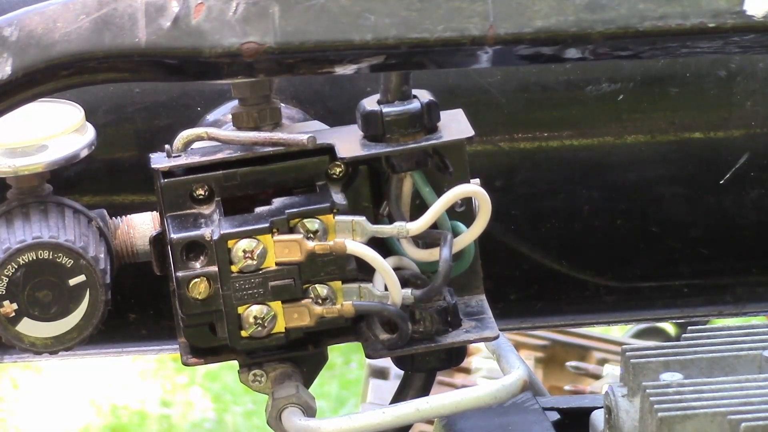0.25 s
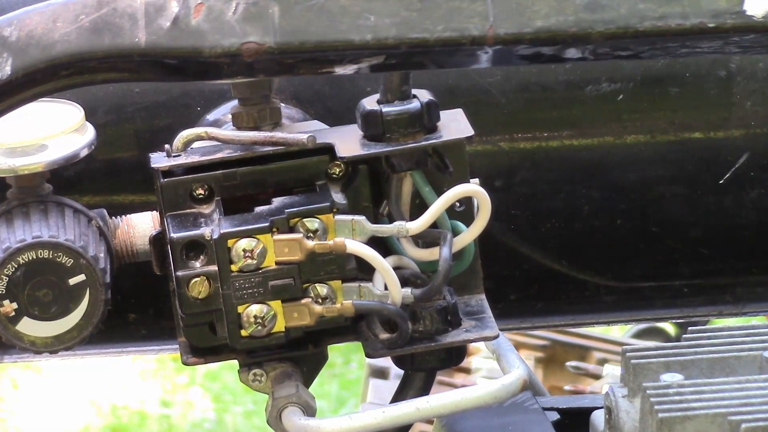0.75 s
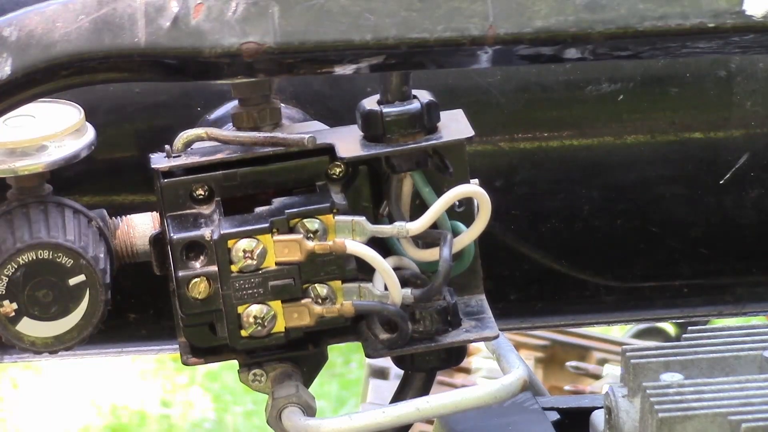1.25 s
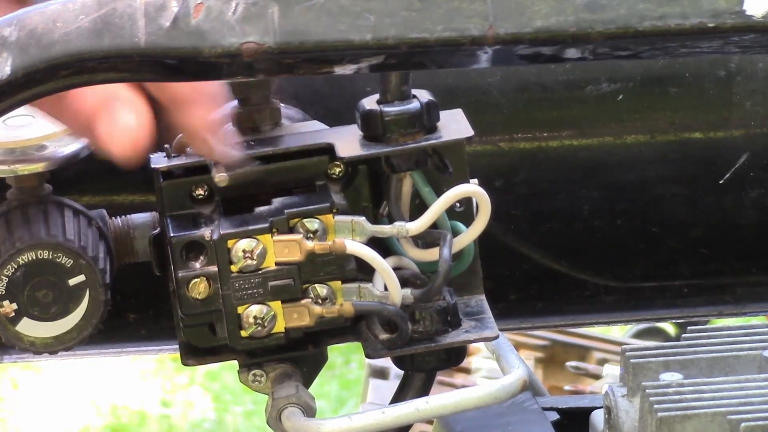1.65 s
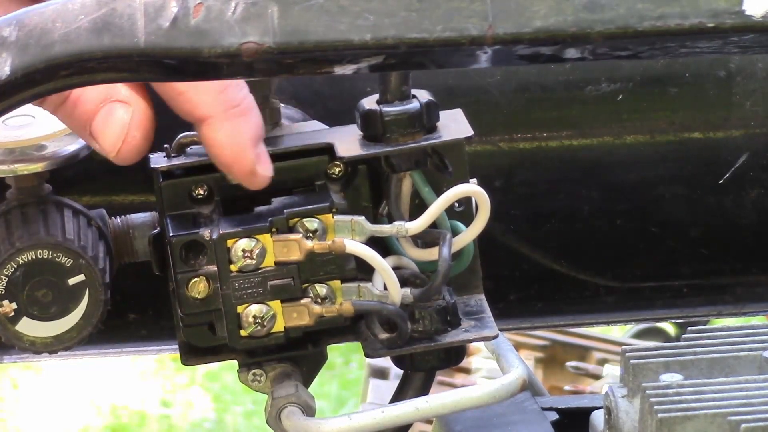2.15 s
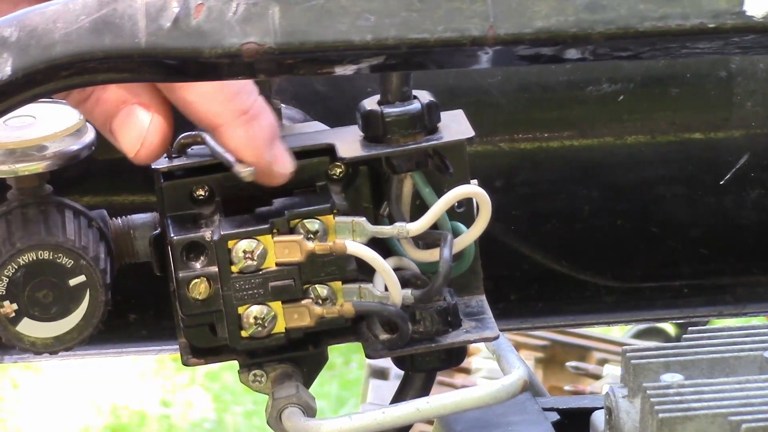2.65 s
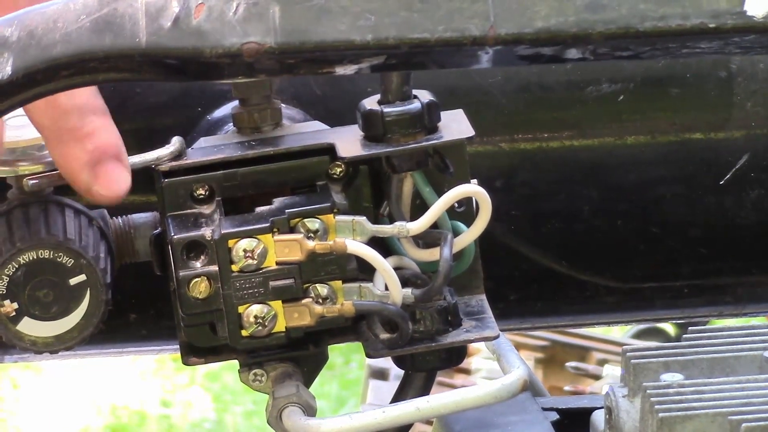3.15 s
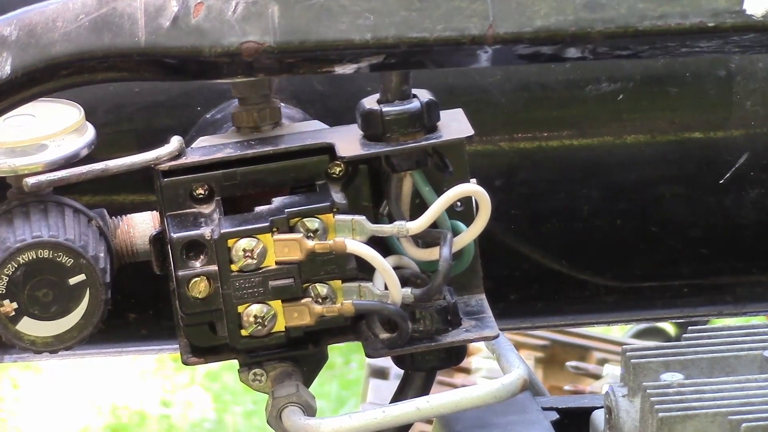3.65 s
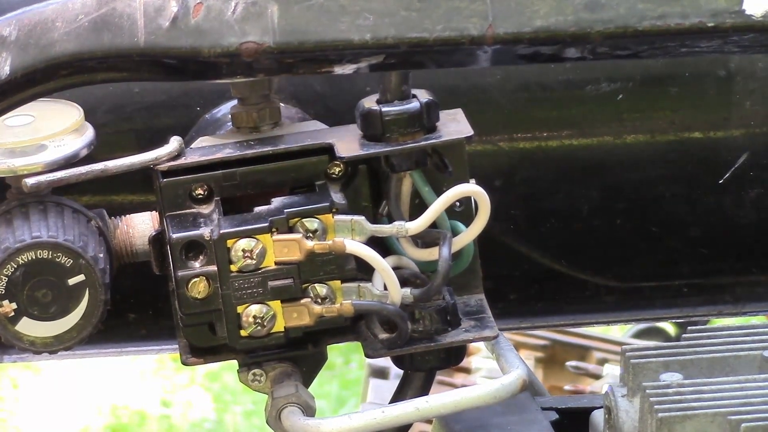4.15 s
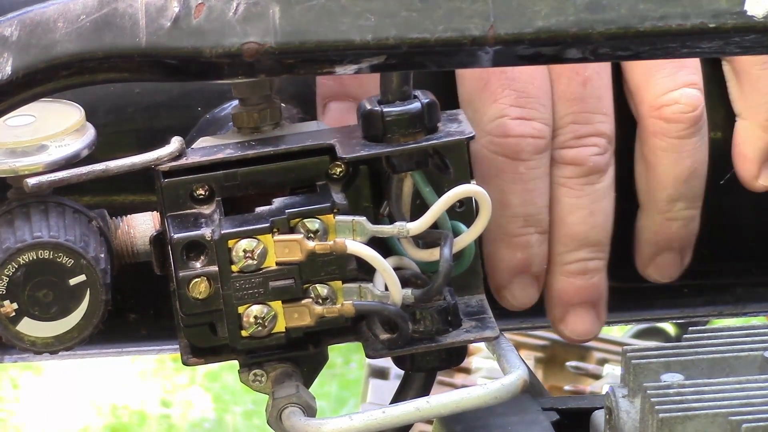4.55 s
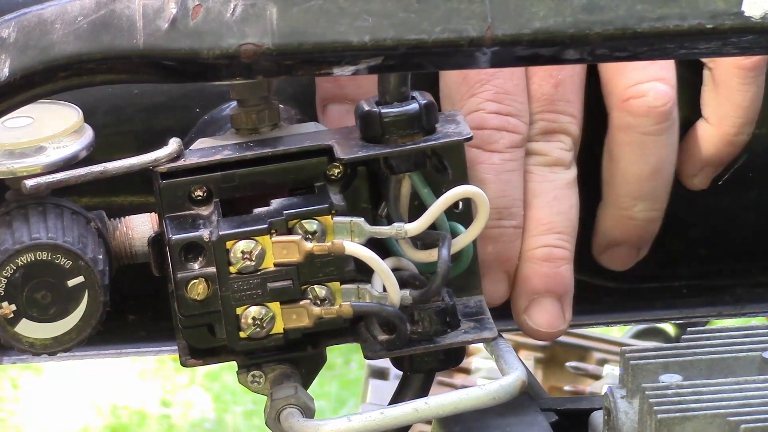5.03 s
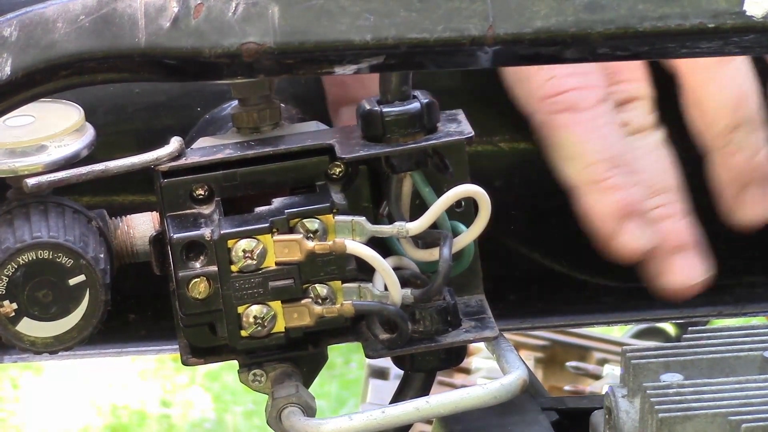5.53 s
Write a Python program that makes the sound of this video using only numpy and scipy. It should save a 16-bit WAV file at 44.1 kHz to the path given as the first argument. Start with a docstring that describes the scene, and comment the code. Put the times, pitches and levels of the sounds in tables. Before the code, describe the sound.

An air compressor's safety valve hisses loudly over the thudding pump, which coasts to a stop; the hiss then cuts off.

```python
"""A yard, close to a piston air compressor that blows off through its safety valve with a loud hiss.
The pump thuds and clacks under the jet until the motor is switched off and it coasts to rest.
A hand reaches in, recolouring the hiss, and the valve closes in two steps with a breathy whistle.
The automatic gain comes back up on faint outdoor air: a bird calls, and the valve weeps as the hand
lets go."""
import sys
import numpy as np
from scipy import signal
from scipy.fft import rfft, irfft
from scipy.io import wavfile
from scipy.ndimage import uniform_filter1d

SR = 44100
rng = np.random.default_rng(int(sys.argv[2]) if len(sys.argv) > 2 else 0)


def file_out(sig):
    """Save sig as 16-bit WAV at sys.argv[1]."""
    # one column per channel
    cols = np.atleast_2d(sig).T
    # limit, then scale
    lim = np.clip(cols, -1, 1)
    pcm = np.round(lim * 32767).astype(np.int16)
    wavfile.write(sys.argv[1], SR, pcm)


N = 255339
T = np.arange(N) / SR
HZ = np.maximum(np.arange(N // 2 + 1) * SR / N, 1)


def undb(db):
    """Decibels to gain."""
    return 10 ** (np.asarray(db) / 20)


def unit(x):
    """Scale to rms 1."""
    return x / np.sqrt(np.mean(x ** 2))


def curve(points):
    """Automation line through (time_s, value) points."""
    return np.interp(T, *np.transpose(points))


def bell(centre_s, width_s):
    """Smooth swell in time, 1 at its centre."""
    return np.exp(-((T - centre_s) / width_s) ** 2)


def colour(points):
    """EQ curve through (freq_hz, gain_db) points."""
    hz, db = np.transpose(points)
    return undb(np.interp(np.log(HZ), np.log(hz), db))


def peak(hz, width_hz):
    """Bell-shaped resonance, 1 at its centre."""
    return 1 / (1 + (2 * (HZ - hz) / width_hz) ** 2)


def noise(eq):
    """Noise of rms 1, shaped by an EQ curve."""
    return unit(irfft(rfft(rng.standard_normal(N)) * eq, N))


def drift(rate_hz):
    """Smooth random wobble of rms 1."""
    return noise(1 / (1 + (HZ / rate_hz) ** 4))


def ring(x, eq):
    """Ring a sound through an EQ curve, made causal by folding the cepstrum."""
    cepstrum = irfft(np.log(eq), N)
    cepstrum[1:] *= 2
    cepstrum[N // 2:] = 0
    return irfft(rfft(x) * np.exp(rfft(cepstrum)), N)


def echoes(x, t60_s):
    """Diffuse reflections: a decaying noise tail of unit energy."""
    t = T[:SR]
    tail = rng.standard_normal(SR) * undb(-60 * t / t60_s) * (t > .004)
    tail = signal.lfilter([1, 1], [1, -.3], tail)  # surfaces swallow the top
    return signal.fftconvolve(x, tail / np.linalg.norm(tail))[:N]


# Broad tone of the jet: freq_hz, gain_db
JET_EQ = [(30, -42.5), (90, -36), (180, -21), (330, -11), (700, -5.5), (1100, -0.5), (2300, -2.5),
          (4200, -3.0), (6000, -2.5), (8000, -6.5), (10500, -2.5), (12500, -5.5), (14000, -10),
          (15500, -15.5)]
# Resonances of the valve body and gaps between fittings: pitch_hz, width_hz, bare_db, covered_db
VALVE_CAVITIES = [(448, 470, 4, 9.5), (886, 440, 3, 4), (1270, 150, 5, 4), (1445, 60, 1.5, 0),
                  (1990, 350, 2, 6), (2774, 340, 5, 4), (3295, 360, 5.5, 4), (3780, 330, 4, 7),
                  (4304, 210, 4, 6), (4706, 490, 6.5, 8), (5440, 520, 7.5, 9), (5750, 80, 0.5, 3),
                  (6090, 290, 5.5, 7.5), (6664, 65, 6.5, 6.5), (6970, 410, 2, 0.5), (7540, 190, 4.5, 3.4),
                  (8650, 450, 3, 4), (9000, 120, 3, 1), (9750, 450, 3, -1.5), (10730, 290, 3.5, 1.5),
                  (11580, 280, 3.5, 4.5), (12800, 170, 4, 3), (14150, 130, 1.5, 5), (15080, 230, 3.5, 4)]
# Splits between the jet's rumble, roar, hiss and sizzle: freq_hz
JET_CROSSOVERS = [750, 1700, 6500]
# Balance of those four bands: base_db, full_pressure_boost_db, swell_boost_db, hand_boost_db
JET_MIX = [(-48.5, 1.2, 2.2, 3.5), (-39.2, 1.3, 2, 0.76), (-32, 2.5, -0.2, 0.2), (-35, 4.4, -0.2, 0.7)]
# Airflow as the valve closes in two steps: time_s, flow_db
VALVE_FLOW = [(4.895, 0.5), (4.94, -7.5), (5.05, -9.5), (5.061, -9.5), (5.072, -49), (5.1, -70)]


def jet(gain_db=11, flutter_db=0.32, band_flutter_db=0.35, steepen=.018):
    """Turbulent air rings the valve's cavities and dulls as the tank empties; a hand reshapes them."""
    bare_eq = colour(JET_EQ) * undb(sum(db * peak(hz, width) for hz, width, db, _ in VALVE_CAVITIES))
    covered_eq = colour(JET_EQ) * undb(sum(db * peak(hz, width) for hz, width, _, db in VALVE_CAVITIES))
    pressure = np.exp(-(T / 0.95) ** 1.3)  # the excess bleeds away, fastest in the first second
    swell = bell(centre_s=2.94, width_s=0.77)  # the rumble and roar swell once
    reach = np.clip((T - 3.5) / 0.45, 0, 1)  # the hand moves in
    cover = 0.14 + 0.86 * reach
    turbulence = rfft(rng.standard_normal(N))
    band_index = np.searchsorted(JET_CROSSOVERS, HZ)
    air = np.zeros(N)
    for k, (base_db, pressure_db, swell_db, hand_db) in enumerate(JET_MIX):
        band = turbulence * (band_index == k)
        bare = unit(irfft(band * bare_eq, N))
        covered = unit(irfft(band * covered_eq, N))
        band_db = base_db + pressure_db * pressure + swell_db * swell + hand_db * reach
        air += ((1 - cover) * bare + cover * covered) * undb(band_db + band_flutter_db * drift(16))
    # tiny shocks make the pressure wave lopsided
    shocks = irfft(rfft(air * unit(air)) * (HZ > 900), N)
    return (air - steepen * shocks) * undb(gain_db + curve(VALVE_FLOW) + flutter_db * drift(27))


def tank(machine, pitch_hz=1245, width_hz=60, send_db=-12):
    """The steel tank rings faintly along with the machine."""
    return undb(send_db) * ring(echoes(machine, t60_s=0.066), peak(pitch_hz, width_hz))


# Body of one delivery thud: freq_hz, gain_db
THUD_EQ = [(20, -21.5), (58, -17), (110, -14), (175, -1.5), (290, -1.5), (450, -13.5), (900, -36.5),
           (3000, -77)]
# The crankshaft runs, then coasts to rest: time_s, turns_per_s
SHAFT_SPEED = [(0, 29.19), (1.8, 29.19), (2.83, 29.3), (2.866, 27.5), (2.907, 21.7), (2.965, 14.3),
               (3.056, 8.5), (3.22, 0)]


def pump(motor_off_s=2.9, thud_db=-40, growth_db=4.5, coast_db=-6.5, clack_db=-29, clack_turns=0.056):
    """Each turn gives a delivery thud, a reed clack and, at speed, a gulp that rings the air filter."""
    speed = curve(SHAFT_SPEED)
    pace = speed / speed.max()
    turns = np.cumsum(speed) / SR - .14
    deliveries = np.diff(np.floor(turns), prepend=-1) * undb(0.39 * drift(14))
    gulps = np.diff(np.floor(turns - 0.299), prepend=-1) * pace ** 4 * undb(.8 * drift(20))
    air_filter = peak(hz=214, width_hz=84) * HZ / (HZ + 100)
    thuds = ring(gulps, air_filter) - ring(deliveries, colour(THUD_EQ))
    thuds /= np.std(thuds[pace > .9])
    turns_since_clack = (turns - .06) % 1
    clacks = noise(peak(hz=1250, width_hz=350)) * np.exp(-turns_since_clack / clack_turns) * pace ** .3
    # strokes grow heavier while the motor runs and lighter as it coasts
    stroke_db = thud_db + growth_db * np.minimum(T / motor_off_s, 1) ** 2 + coast_db * (1 - pace)
    return undb(stroke_db) * thuds + undb(clack_db) * clacks


def fan(level_db=-72):
    """The cooling fan buffets the air, fading as the shaft slows."""
    speed = curve(SHAFT_SPEED)
    return noise(peak(hz=70, width_hz=130) ** 2) * undb(level_db) * (speed / speed.max()) ** 2


# Tone of the outdoor bed: freq_hz, gain_db
AIR_EQ = [(20, 1), (80, 8.5), (250, -0.5), (700, -0.5), (1500, -8.5), (2500, -8), (6500, -17.5),
          (12500, -25), (15500, -30)]


def outdoor_air(level_db=-69):
    """A faint, even bed of outdoor air, heavy in the lows."""
    return noise(colour(AIR_EQ)) * undb(level_db)


# The machine settling: centre_s, width_s, level_db
SETTLING_BUMPS = [(2.96, .03, -60), (3.19, 0.038, -50), (3.79, .04, -64)]


def bumps():
    """Soft, low bumps as the machine comes to rest."""
    swells = sum(undb(db) * bell(centre_s, width_s) for centre_s, width_s, db in SETTLING_BUMPS)
    return noise(peak(hz=38, width_hz=35) ** 2) * swells


def seat_whistle(gap_eq, seated_s=5.05, gain_db=-27, rise_db_per_s=30):
    """Air squeezed through the narrowing gap whistles up out of the hiss until the valve seats."""
    whistle_db = gain_db - rise_db_per_s * np.maximum(seated_s - T, 0)
    return noise(gap_eq) * undb(whistle_db + curve(VALVE_FLOW))


# One quick bird phrase: start_s, length_s, start_pitch_hz, end_pitch_hz, level_db
BIRD_NOTES = [(5.183, 0.09, 6600, 4930, -74), (5.245, 0.053, 2640, 2450, -76),
              (5.255, 0.021, 3300, 2600, -73), (5.312, 0.028, 3540, 3460, -69.5),
              (5.319, 0.022, 4500, 3550, -75), (5.384, 0.085, 2280, 3060, -74),
              (5.41, 0.055, 2730, 3800, -70), (5.448, 0.067, 3550, 4060, -74),
              (5.497, 0.03, 3100, 2090, -76)]


def bird(rasp=.024, glide_ease=1.6, direct_db=-3, echo_db=-2):
    """Raspy whistles glide fast and ease onto their end pitch, blurred by the yard."""
    song = np.zeros(N)
    for start_s, length_s, start_hz, end_hz, level_db in BIRD_NOTES:
        progress = np.clip((T - start_s) / length_s, 0, 1)
        glide_hz = end_hz + (start_hz - end_hz) * (1 - progress) ** glide_ease
        pitch_hz = glide_hz * (1 + rasp * drift(300))
        envelope = np.sqrt(8 * progress * (1 - progress))
        song += undb(level_db) * envelope * np.sin(2 * np.pi * np.cumsum(pitch_hz) / SR)
    return undb(direct_db) * song + undb(echo_db) * echoes(song, t60_s=0.28)


# Tone of the leak past the seat: freq_hz, gain_db
LEAK_EQ = [(200, -12), (1500, -3.5), (4000, 1.5), (5600, -2), (7500, -5), (9500, -4), (12500, -8.5),
           (15500, -14.5)]


def seat_weep(gap_eq, gap_db=8.5, puff_s=5.6, puff_db=-65.5, rise_db_per_s=270, sag_db=10, sag_s=0.09):
    """Air leaks past the seat, tinted by the gap: a quick puff that sags to a steady weep."""
    before_s, after_s = np.maximum(puff_s - T, 0), np.maximum(T - puff_s, 0)
    level_db = puff_db - rise_db_per_s * before_s - sag_db * (1 - np.exp(-after_s / sag_s))
    return noise(colour(LEAK_EQ) * undb(gap_db * gap_eq)) * undb(level_db + .8 * drift(30))


def scene(near_db=-21, far_db=-39, side_db=-28):
    """The machine sits close and centred, with quick reflections off itself and a faint wall tail."""
    gap_eq = peak(hz=5450, width_hz=340)  # resonance of the gap at the valve seat
    machine = jet() + seat_whistle(gap_eq) + seat_weep(gap_eq) + pump() + fan() + bumps()
    reflections = undb(near_db) * echoes(machine, t60_s=0.17)
    wall_tail = undb(far_db) * ring(echoes(machine, t60_s=0.89), peak(hz=0, width_hz=9000))
    mid = machine + tank(machine) + reflections + wall_tail + bird() + outdoor_air()
    side = undb(side_db) * outdoor_air()
    return np.array([mid + side, mid - side])


def record(dry):
    """Automatic gain ducks while the sound is loud and holds briefly; a steep low-pass cuts the top."""
    threshold_db, duck_db, hold_s, cutoff_hz = -36, -11.5, .19, 15750
    loud = uniform_filter1d(dry[0] ** 2, size=128) > undb(threshold_db) ** 2
    last_loud_s = np.maximum.accumulate(np.where(loud, T, 0))
    ducked = T - last_loud_s < hold_s
    gain = uniform_filter1d(undb(duck_db * ducked), size=32)
    low_pass = signal.ellip(10, .1, 80, cutoff_hz, fs=SR, output="sos")
    return signal.sosfilt(low_pass, dry * gain)


dry = scene()
out = record(dry)
file_out(out)
```